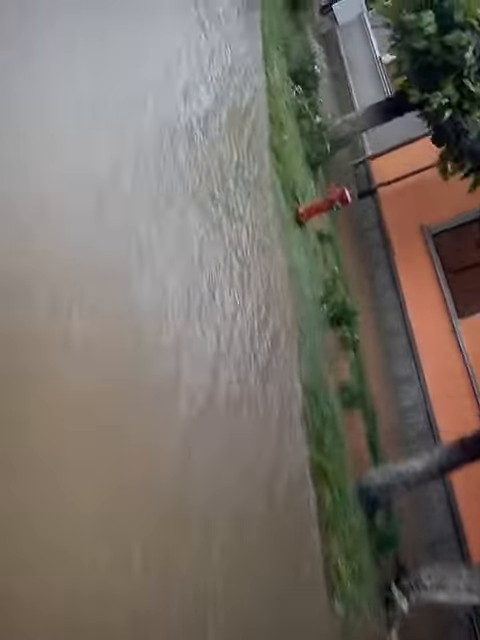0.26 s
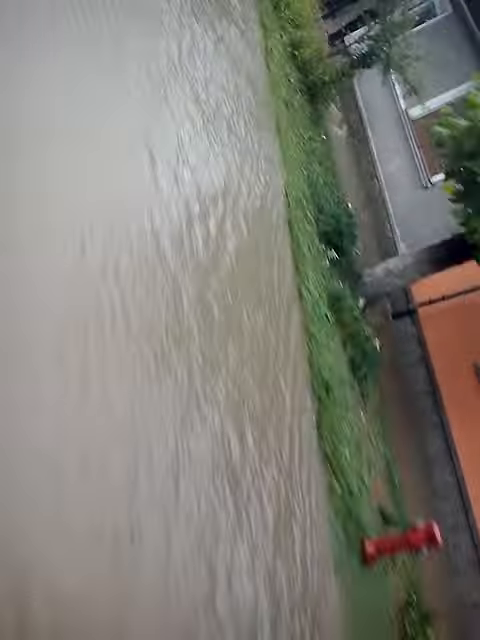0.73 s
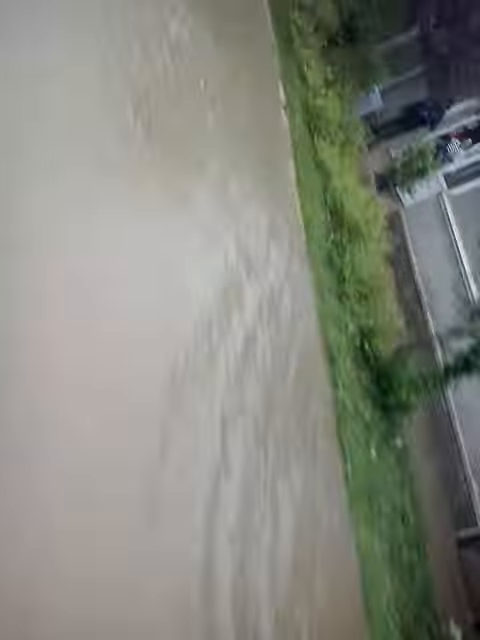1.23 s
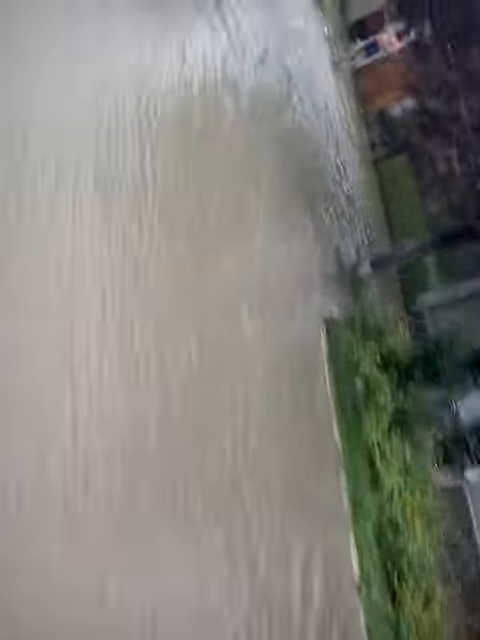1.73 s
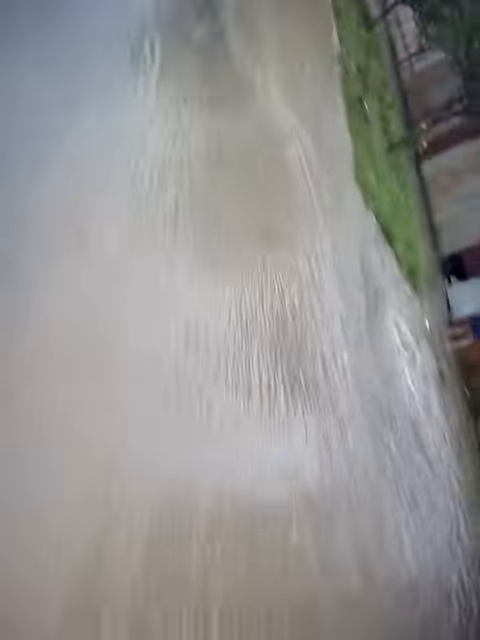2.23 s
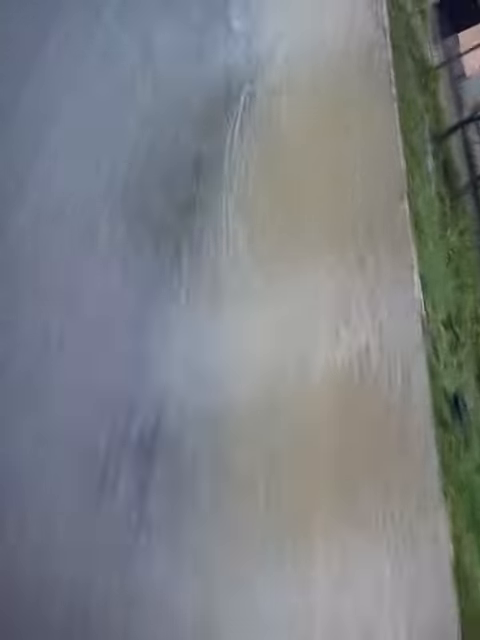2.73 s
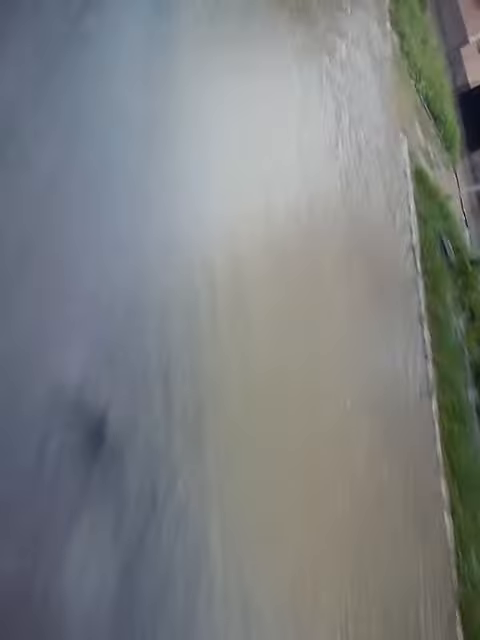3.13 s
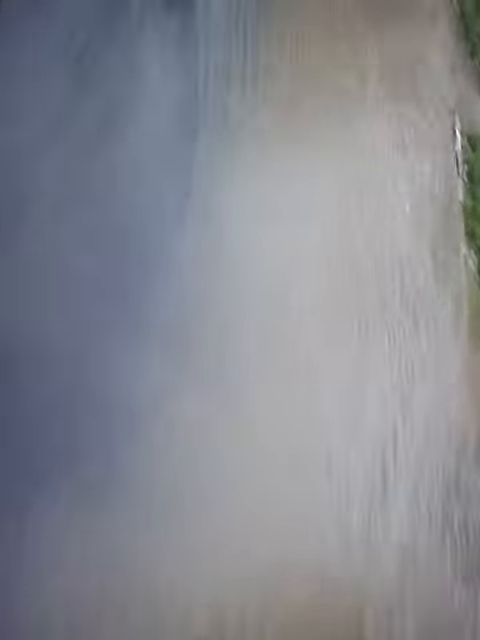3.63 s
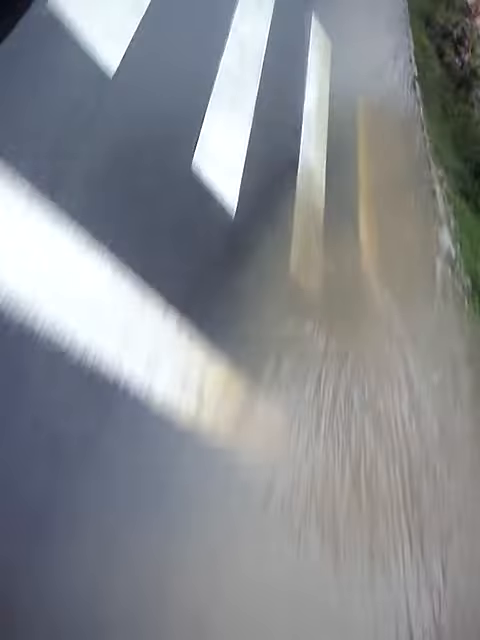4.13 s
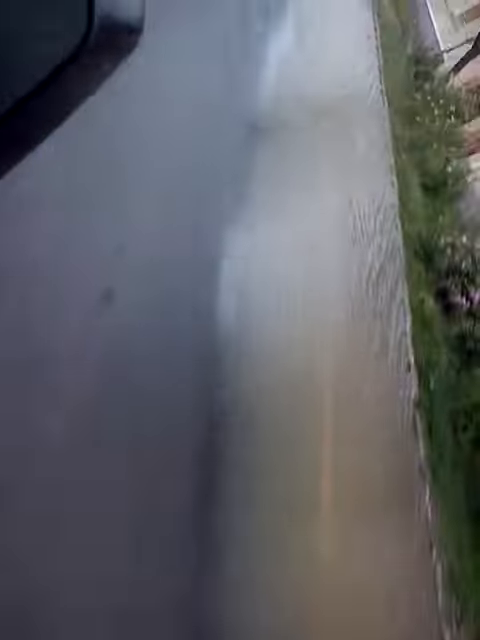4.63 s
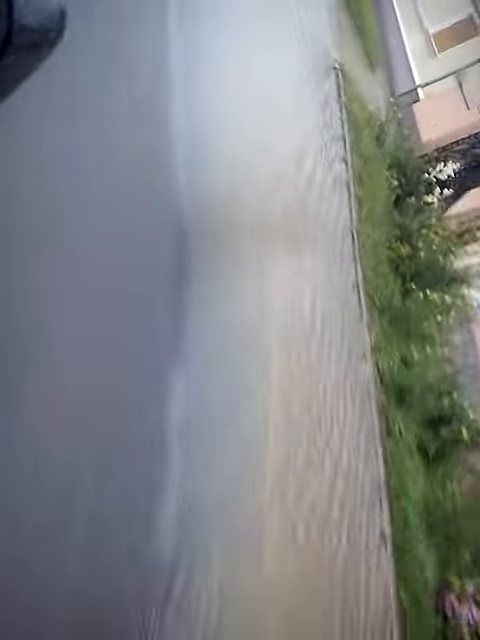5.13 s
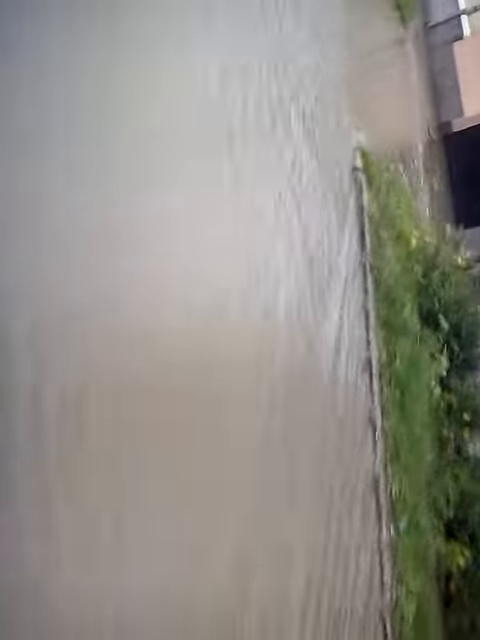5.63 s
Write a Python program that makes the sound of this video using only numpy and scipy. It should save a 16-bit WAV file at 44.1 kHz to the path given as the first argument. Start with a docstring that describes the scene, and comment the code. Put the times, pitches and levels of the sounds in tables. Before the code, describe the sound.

A vehicle drives through flood water, heard at its open side window. The tyres throw up a steady rushing, hissing spray over a dull rumble of engine and road. Wind buffets the microphone throughout with a lumpy rumble and low thuds. About halfway, sharp little cracks from air and stray drops join in; then the spray thins and the fluttering wind dominates.

```python
"""At the open side window of a vehicle driving through flood water.
The tyres throw a rushing, hissing sheet of spray that thins out after three and a half seconds,
over a low road rumble. One airstream buffets the microphone: its strength sets a lumpy rumble
and a flutter. Single swirls of air (eddies) thud, and from two and a half seconds on
small fast ones and stray drops hit the microphone's opening with sharp little cracks."""
import sys
import numpy as np
from scipy import signal
from scipy.fft import rfft, irfft, next_fast_len
from scipy.io import wavfile
from scipy.ndimage import uniform_filter1d

SR = 44100
rng = np.random.default_rng(int(sys.argv[2]) if len(sys.argv) > 2 else 0)


def generate_wav(signal):
    """Clip the signal to [-1, 1] and save it as 16-bit WAV at the path in sys.argv[1]."""
    frames = np.transpose(np.atleast_2d(signal))
    scaled = np.clip(frames, -1, 1) * 32767
    pcm = np.round(scaled).astype(np.int16)
    wavfile.write(sys.argv[1], SR, pcm)


N = 258867
TIME = np.arange(N) / SR


def from_db(db):
    """Turn decibels into a number to multiply by."""
    return 10 ** (np.asarray(db) / 20)


def rms_one(x):
    """Scale a signal to an average power of 1."""
    return x / np.sqrt(np.mean(x ** 2) + 1e-20)


def levelled(x, size=4000):
    """Even out swells slower than `size` samples and keep the fine grain."""
    return x / np.sqrt(uniform_filter1d(x ** 2, size=size) + 1e-12)


def in_time(rows):
    """Join a table's points with straight lines: one curve for each column after the time."""
    times, *columns = np.transpose(rows)
    return [np.interp(TIME, times, column) for column in columns]


def bumps(rows, half_s):
    """Short bell-shaped changes of level, in dB."""
    return sum(db * np.exp(-((TIME - s) / half_s) ** 2) for s, db in rows)


def swells(times, levels_db, rise_s):
    """The loudness of blows that each peak after the rise time and die away."""
    out = np.zeros(N)
    for s, db in np.broadcast(times, levels_db):
        age = np.clip((TIME - s) / rise_s, 0, 20)
        out += from_db(db) * age * np.exp(1 - age)
    return out


def drift(hz):
    """Smooth random wandering, typically by about 1; a higher `hz` is quicker."""
    r = np.exp(-16 * np.pi * hz / SR)
    slow = signal.lfilter([1], [1, -2 * r, r * r], rng.standard_normal(N // 8 + 4002))[4000:]
    return np.interp(np.arange(N) / 8, np.arange(len(slow)), rms_one(slow))


def coloured(x, tone):
    """Shape a signal with a tone table, fading 18 dB an octave past its ends; power 1."""
    size = next_fast_len(N)
    hz, db = np.transpose(tone)
    octave, points = np.log2(np.maximum(np.fft.rfftfreq(size, 1 / SR), 1)), np.log2(hz)
    beyond = np.abs(octave - np.clip(octave, points[0], points[-1]))
    gain = from_db(np.interp(octave, points, db) - 18 * beyond)
    return rms_one(irfft(rfft(x, size) * gain, size)[:N])


def noise(tone):
    """Smooth noise with a given tone."""
    return coloured(rng.standard_normal(N), tone)


def impacts(per_s, spread_db):
    """Randomly timed clicks, many small and a few large."""
    sizes = from_db(spread_db * np.minimum(rng.exponential(1, N), 4)) * rng.choice([-1, 1], N)
    return sizes * (rng.random(N) < per_s / SR)


def jumps(times, levels_db, tone):
    """Single pressure pulses of a given tone; the tallest reaches the highest level."""
    clicks = np.zeros(N)
    clicks[(times * SR).astype(int)] = from_db(levels_db)
    pulses = coloured(clicks, tone)
    return pulses * clicks.max() / np.abs(pulses).max()


def resonator(hz, width_hz):
    """A resonance: a filter that favours a band of pitches around `hz`."""
    r = np.exp(-np.pi * width_hz / SR)
    return np.array([1, 0, -1]) * (1 - r * r) / 2, [1, -2 * r * np.cos(2 * np.pi * hz / SR), r * r]


def resonate(x, hz, width_hz, passes):
    """Keep the sound near one pitch; each pass removes more of the rest."""
    for _ in range(passes):
        x = signal.lfilter(*resonator(hz, width_hz), x)
    return x


def gliding(x, hz, width_hz, size=512):
    """A resonance whose pitch moves every `size` samples."""
    out, state = np.zeros(N), np.zeros(2)
    for i in range(0, N, size):
        out[i:i + size], state = signal.lfilter(*resonator(hz[i], width_hz), x[i:i + size], zi=state)
    return out


# narrow resonances that colour the rush (pitch [Hz], width [Hz], level [dB])
RESONANCE_PITCHES = [(1555, 59, -6), (1863, 28, -15.5), (2051, 42, -6), (2104, 36, -6.5), (2257, 30, -10),
                     (2473, 22, -8.5)]
# how they slide together (time [s], change [share of pitch])
RESONANCE_SLIDE = [(0, 0.0078), (1.0, -0.0098), (1.9, -0.006), (2.6, 0.022), (3.8, 0.009), (4.8, -0.0011),
                   (5.87, -.0077)]
# how much they stand out (time [s], boost [dB])
RESONANCE_BOOST = [(0, 4), (.7, 3), (1.3, 10.5), (1.8, 3.5), (2.2, 2), (2.9, 8), (3.6, 6), (5.87, 3)]


def rush_resonances(rush):
    """A few narrow, slowly sliding resonances colour the rush of spray; each also strays a little."""
    slide, = in_time(RESONANCE_SLIDE)
    boost_db, = in_time(RESONANCE_BOOST)
    bands = sum(from_db(db) * gliding(rush, hz * (1 + slide + 0.0059 * drift(hz=0.93)), width_hz)
                for hz, width_hz, db in RESONANCE_PITCHES)
    return from_db(boost_db) * bands


# water thrown by the tyres (time [s], relative rush level [dB], relative mist level [dB])
SPRAY_LEVELS = [(0, -23.5, -31.5), (1.3, -23, -31), (1.8, -23, -31.5), (2.16, -24, -28.5),
                (2.52, -24, -27.5), (2.66, -25.5, -31), (2.9, -30, -36), (3.24, -27.5, -30),
                (3.48, -28, -30), (3.6, -40.5, -38.5), (3.8, -36, -41), (4.03, -39, -42),
                (4.14, -32, -41.5), (4.4, -32.5, -42.5), (4.64, -36, -46.5), (4.9, -37.5, -45),
                (5.76, -34.5, -44), (5.87, -33, -40)]
# brief spurts of mist (time [s], boost [dB])
MIST_SPURTS = [(.182, 5.5), (.275, 1.5), (.535, 3.5), (.657, 3.5), (.884, 4)]
# the tone of the big drops and of the fine mist (frequency [Hz], level [dB])
RUSH_TONE = [(250, -14), (600, -3.5), (1000, -7.5), (1350, -6.5), (1800, -2.5), (2250, -4), (2450, -7.5),
             (2550, -12), (3100, -21), (4000, -26.5), (6000, -31.5)]
MIST_TONE = [(1500, -14), (3000, -7), (3800, -5.5), (4800, -2), (5300, 1.5), (6100, 2), (6900, 0),
             (7300, -9), (7700, -24.5)]


def spray():
    """Thousands of drops land in surges; big ones make the rush, the finest a hiss."""
    rush_db, mist_db = in_time(SPRAY_LEVELS)
    mist_db += bumps(MIST_SPURTS, half_s=0.021)
    surge = drift(hz=35)
    big_drops = impacts(per_s=14000 * from_db(1.3 * surge), spread_db=2)
    rush = coloured(big_drops, RUSH_TONE)
    rush = levelled(rush + rush_resonances(rush), size=5000)
    fine_drops = impacts(per_s=12000 * from_db(surge + 2 * drift(hz=70)), spread_db=1)
    mist = levelled(coloured(fine_drops, MIST_TONE), size=5000)
    return from_db(rush_db + 3) * rush + from_db(mist_db + 0.92) * mist


# the tone of the engine and tyres (frequency [Hz], level [dB])
ROAD_TONE = [(30, -31.5), (60, 0), (110, 0), (250, -9.5), (600, -10), (1500, -16)]


def road():
    """Engine and rolling tyres merge into one dull, steady rumble."""
    return from_db(-28) * levelled(noise(ROAD_TONE))


# the airstream at the microphone (time [s], strength [dB])
AIR_STRENGTH = [(0, -3.5), (.22, -6), (.7, -3), (1.1, 1), (1.3, 0.5), (1.86, 1.3), (2.05, -4), (2.42, -0.5),
                (2.64, 0.5), (2.8, -2), (3.0, -2.5), (3.2, 2.5), (3.52, 3.5), (3.68, 0.5), (4.08, -1.5),
                (4.36, 2), (4.6, -1), (5.22, 0.5), (5.45, -2), (5.87, 0)]
# moments when it stalls (time [s], dip [dB])
AIR_LULLS = [(.205, 8), (.69, 3), (1.215, 3.5), (1.48, 6.5), (1.655, 6), (1.735, 1.5), (1.945, 5.5),
             (2.095, -1.5), (2.4, 14), (2.715, 2), (2.765, 3.5), (3.085, -0.5), (3.67, 4.5), (3.775, 1),
             (4.04, 5), (4.545, 3.5), (4.685, 4), (4.82, 4), (4.945, 2.5), (5.165, 3), (5.375, 2),
             (5.585, 5)]
# how broken up it is (time [s], raggedness [0 smooth to 1 ragged])
AIR_RAGGEDNESS = [(0, 0.066), (2.2, 0.088), (2.6, 0.97), (3.3, 0.99), (4.0, 0.19), (4.5, 0.95), (5.2, 0.8),
                  (5.4, 1), (5.87, 0.21)]
# the tone of the big eddies and of the small ones (frequency [Hz], level [dB])
RUMBLE_TONE = [(20, -34.5), (35, -22), (50, -10), (65, -5.5), (88, 3), (130, 0), (200, -2.5), (300, -8.5),
               (500, -17), (1000, -42.5)]
FLUTTER_TONE = [(100, 7), (220, 5), (420, 3.5), (700, -1.5), (1100, -5), (1600, -10), (2200, -20.5),
                (2650, -35), (3400, -53.5), (5000, -44.5)]


def wind():
    """Big eddies rumble; small ones ride on them in clumps and flutter, more so in ragged air."""
    # the flow also drops just before each crack (see cracks below)
    dips = [(s - 0.0087, 5.5 * from_db(db)) for s, db, _ in CRACK_HITS]
    air_db = in_time(AIR_STRENGTH)[0] - bumps(AIR_LULLS, half_s=0.02) - bumps(dips, half_s=0.0027)
    ragged, = in_time(AIR_RAGGEDNESS)
    shift_db = 3.25 * ragged   # taken from the rumble, given to the flutter
    eddies = drift(hz=100)
    rumble = levelled(noise(RUMBLE_TONE) * from_db(0.37 * eddies), size=2000)
    rumble *= from_db(-17 + air_db - shift_db)
    capped_eddies = 1.1 * np.tanh(eddies / 1.1)
    clumps = levelled(from_db((2 + 1.1 * ragged) * capped_eddies), size=5000)
    flutter = levelled(noise(FLUTTER_TONE) * clumps, size=1700)
    flutter *= from_db(-22.5 + 0.91 * air_db + shift_db)
    # the strongest clumps tear at the microphone's opening and crackle
    tears = impacts(per_s=210 * (ragged * clumps) ** 2, spread_db=3)
    crackle = from_db(-11.5) * resonate(tears, hz=2400, width_hz=1900, passes=3)
    return rumble + flutter + crackle


# heavy gusts (time [s], level [dB], pitch [Hz])
GUST_HITS = [(.031, -17, 200), (.255, -15, 110), (.415, -17.5, 147), (0.596, -17.5, 163),
             (0.776, -12.5, 250), (0.919, -14.5, 129), (.96, -18, 330), (1.037, -18, 116), (1.1, -18, 130),
             (1.14, -17, 320), (1.174, -9.5, 157), (1.393, -14.5, 140), (1.53, -15.5, 200),
             (1.58, -18.5, 131), (1.621, -15.5, 378), (1.79, -16, 160), (1.846, -12, 210),
             (1.878, -13.5, 100), (1.985, -13.5, 156), (2.271, -16, 213), (2.63, -20, 620),
             (2.656, -9, 288), (2.93, -17.5, 200), (3.175, -20, 646), (3.291, -12, 222),
             (3.413, -12.5, 220), (3.519, -17.5, 600), (3.544, -6.5, 152), (3.725, -15.5, 420),
             (3.797, -13.5, 330), (3.919, -12.5, 170), (4.345, -18, 500), (4.425, -20, 280),
             (4.756, -12, 215), (4.868, -14, 213), (4.995, -16, 216), (5.133, -17, 200), (5.228, -18, 230),
             (5.612, -16, 326), (5.648, -13.5, 295), (5.676, -17, 240), (5.822, -9, 121)]


def thuds():
    """Each heavy gust hits the microphone with a short, low burst of noise."""
    hiss, out = rng.standard_normal(N), np.zeros(N)
    for s, db, hz in GUST_HITS:
        body = resonate(hiss, hz, width_hz=0.84 * hz, passes=2)
        out += levelled(body, size=600) * swells(s, [db], rise_s=0.0056)
    return out


# sharp eddies and stray drops (time [s], relative body level [dB], relative edge level [dB])
CRACK_HITS = [(2.530, -1.5, -26), (2.665, -3, -21), (3.114, 1, -30), (3.204, 3, -27), (3.207, -8, -16),
              (3.295, -2.5, -20), (3.328, 3, -9.5), (3.392, -2.5, -22), (3.440, 4, -12), (3.452, -4, -18),
              (3.525, -1.5, -17), (3.547, -1, -17), (3.586, -1.5, -21), (3.614, -3.5, -16),
              (3.618, 0.5, -19), (3.801, 0, -20), (3.815, 3, -21), (3.822, -2, -23), (3.838, -5.5, -25),
              (3.852, -5, -15.5), (4.008, -3.5, -26), (4.183, 0, -20), (4.200, -5, -20), (4.253, -3, -23),
              (4.303, -4, -26), (4.337, -4, -19), (4.37, -1.5, -15), (4.403, -10, -19), (4.416, -7, -22),
              (4.436, -3.5, -20), (4.456, -3.5, -21), (4.480, 1.5, -20), (4.5154, -2.5, -6.5),
              (4.532, -13, -14), (4.556, -9.5, -13), (4.574, -16, -18), (4.5999, -0.5, -13),
              (4.734, -14, -21), (4.773, -3.5, -13.5), (4.843, -5, -19), (4.875, -9, -25),
              (4.9134, -5.5, -18.5), (5.004, -4.5, -18), (5.015, -6.5, -23), (5.0705, -14, -22),
              (5.147, -2.5, -22), (5.181, -9, -20), (5.1867, -8, -17), (5.220, -8, -13), (5.227, -10, -21),
              (5.237, -11, -23), (5.293, -5, -27), (5.31, -6.5, -25), (5.647, -3.5, -28),
              (5.6685, -6.5, -17), (5.861, -6, -23)]
# the tone of a crack's dull body and of its bright edge (frequency [Hz], level [dB])
BODY_TONE = [(100, -13), (300, -3), (700, 3.5), (1300, -1), (2200, -11.5), (2700, -18.5), (4500, -42)]
EDGE_TONE = [(1200, -8.5), (2200, 12), (3100, 10), (4000, -1.5), (5500, -8), (7000, -20)]


def cracks():
    """Fast eddies and drops slap the microphone's opening and leave a short wake of rough air."""
    body_rise_s, edge_rise_s, wake_db = 0.001133, 0.00069, -12.5
    times, body_db, edge_db = np.transpose(CRACK_HITS)
    body_slaps = jumps(times + body_rise_s, body_db - 10, BODY_TONE)
    edge_slaps = jumps(times + edge_rise_s, edge_db - 3, EDGE_TONE)
    body_wakes = levelled(noise(BODY_TONE), size=110) * swells(times, body_db + wake_db, body_rise_s)
    edge_wakes = levelled(noise(EDGE_TONE), size=60) * swells(times, edge_db + wake_db, edge_rise_s)
    return body_wakes + edge_wakes - body_slaps - edge_slaps


def scene():
    """Everything meets at one microphone."""
    return (spray() + wind() + thuds() + cracks() + road())[None, :]


def record(dry):
    """The microphone loses the deepest bass, flattens the loudest peaks and cuts the high treble."""
    thinned = signal.sosfilt(signal.butter(4, 45, "high", fs=SR, output="sos"), dry)
    flattened = np.clip(thinned, -0.69, 0.69)
    dulled = signal.sosfilt(signal.ellip(8, .2, 45, 7600, fs=SR, output="sos"), flattened)
    # a very faint mirror image of the spray's hiss just above 8000 Hz, from resampling
    flipped = dulled * np.cos(2 * np.pi * 16000 * TIME)
    mirror_image = signal.sosfilt(signal.butter(5, (8200, 8750), "band", fs=SR, output="sos"), flipped)
    clipped = np.clip(dulled + from_db(-12) * mirror_image, -0.705, 0.705)   # overshoots tick thinly
    return signal.sosfilt(signal.ellip(8, .2, 60, 15800, fs=SR, output="sos"), clipped)


dry = scene()
out = record(dry)
generate_wav(out)
```